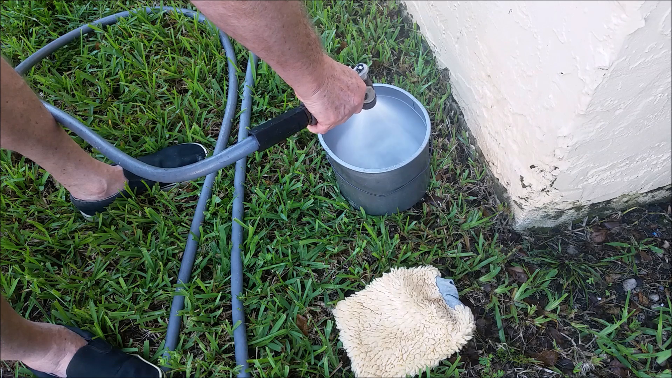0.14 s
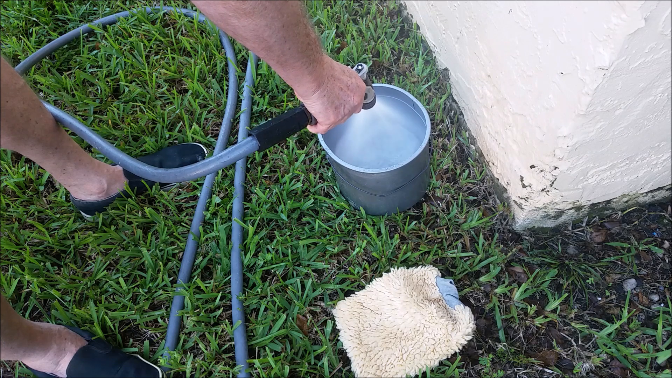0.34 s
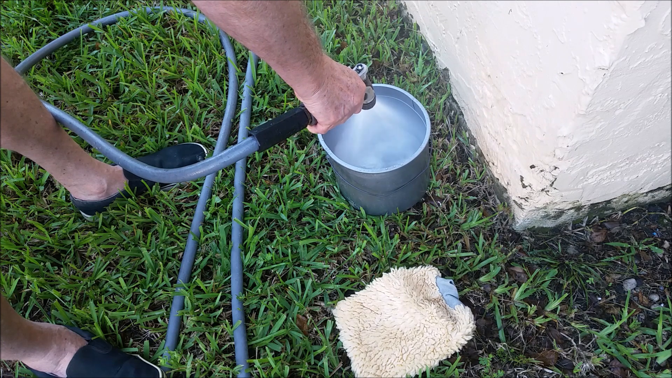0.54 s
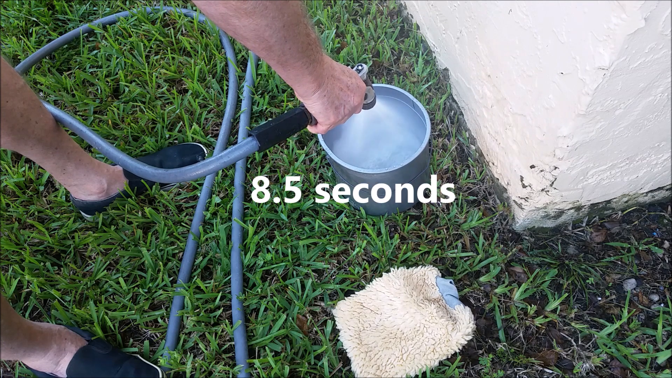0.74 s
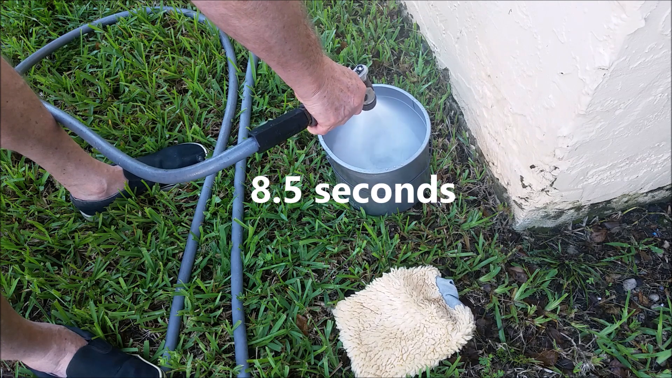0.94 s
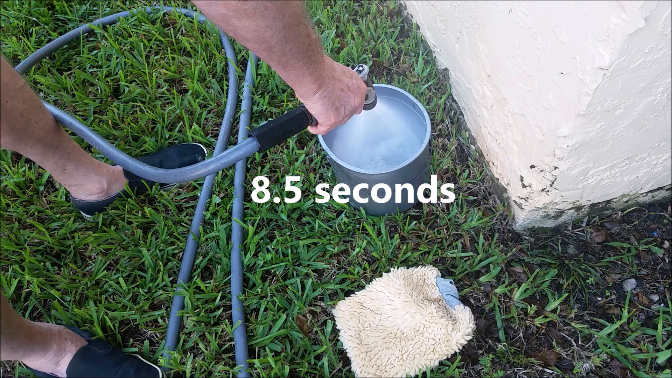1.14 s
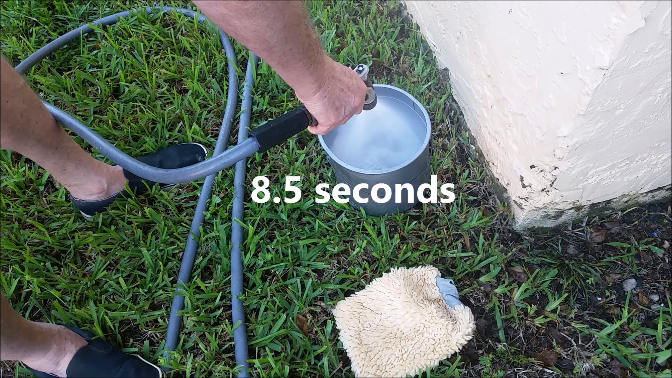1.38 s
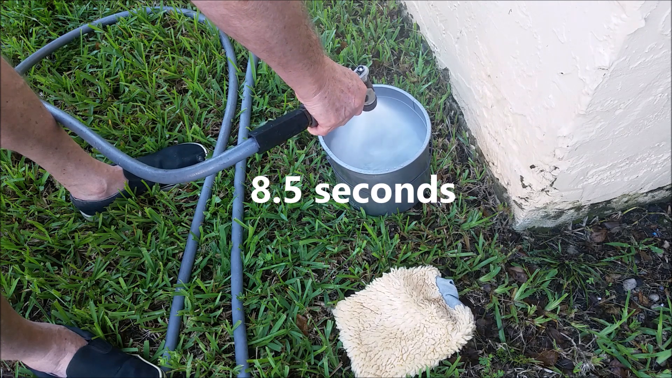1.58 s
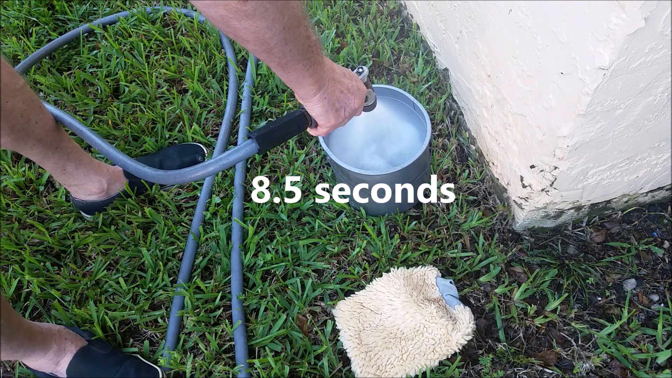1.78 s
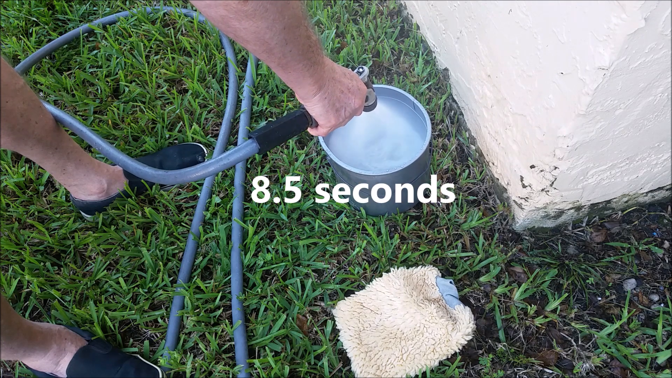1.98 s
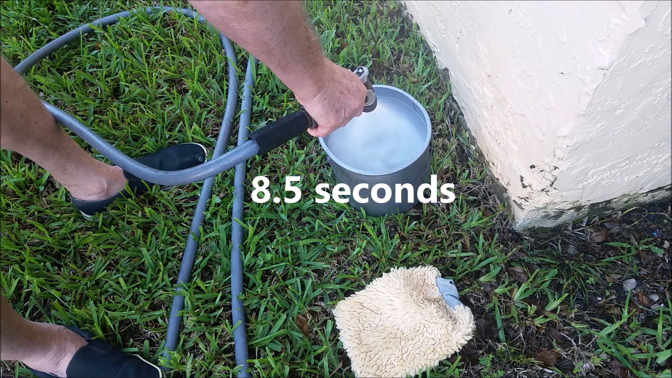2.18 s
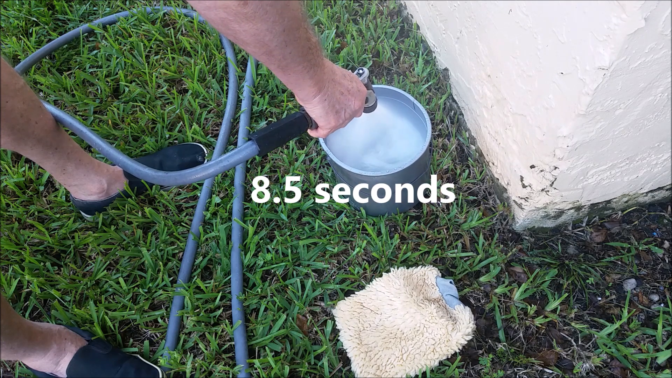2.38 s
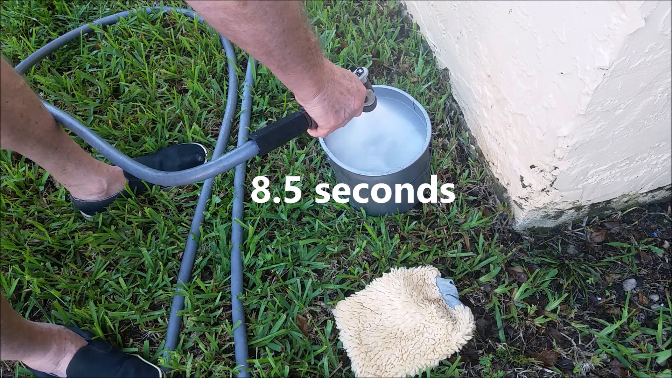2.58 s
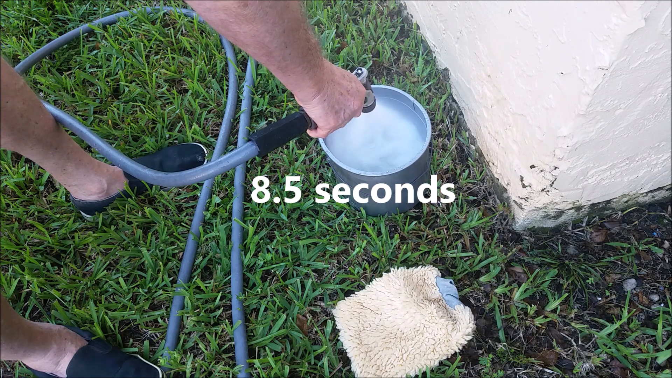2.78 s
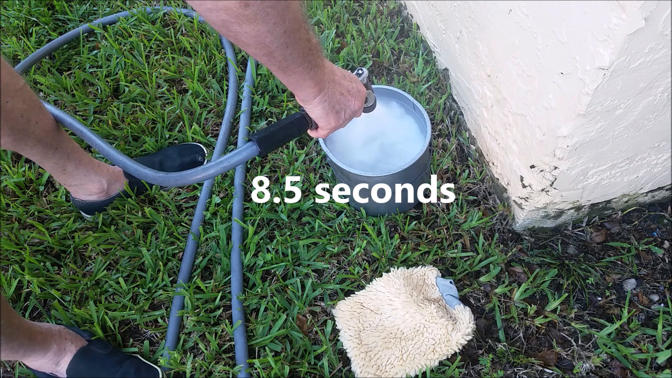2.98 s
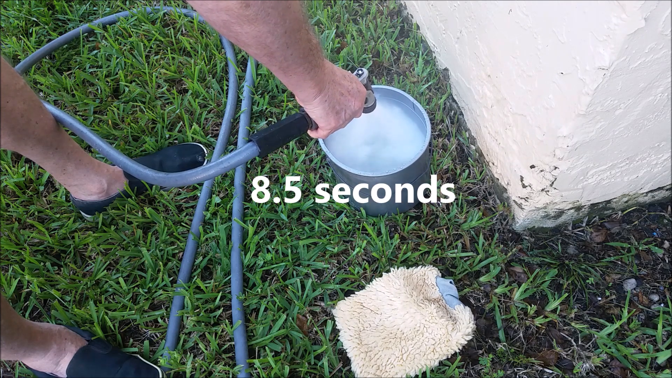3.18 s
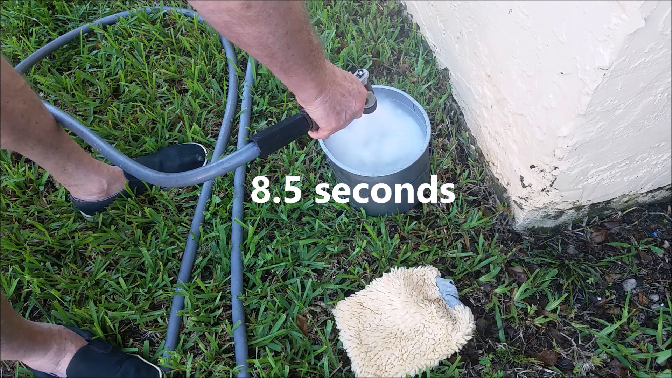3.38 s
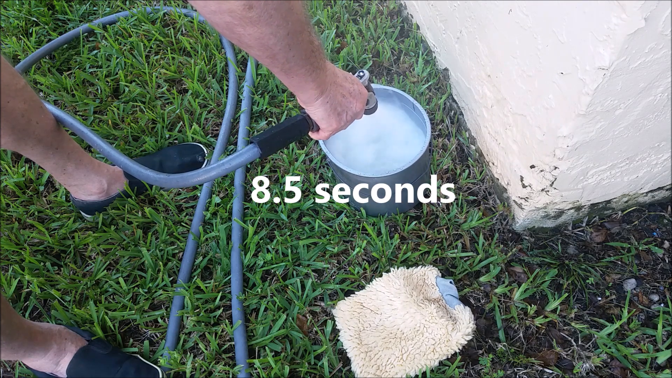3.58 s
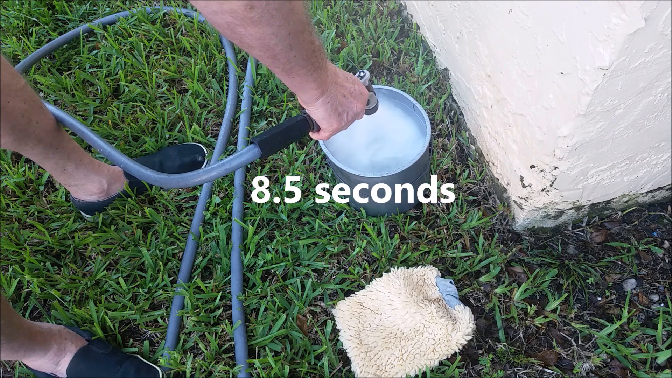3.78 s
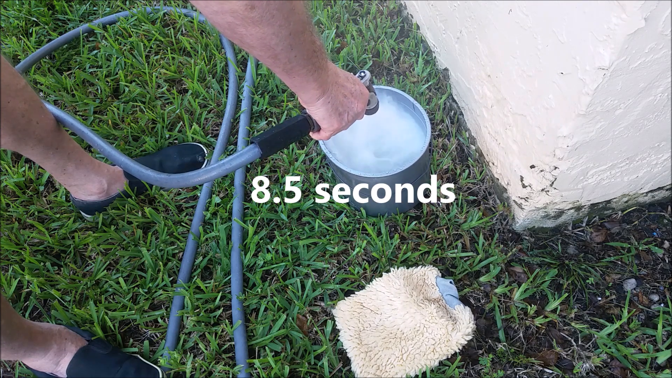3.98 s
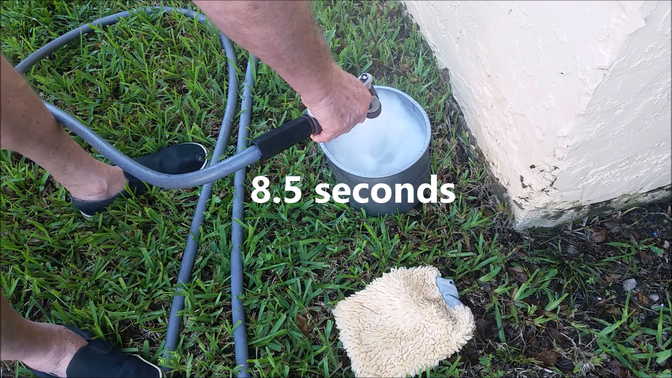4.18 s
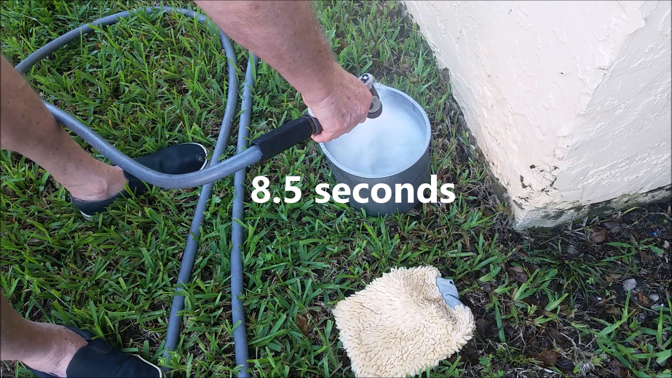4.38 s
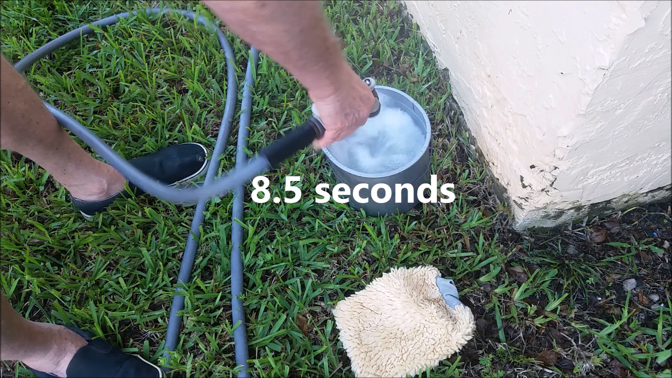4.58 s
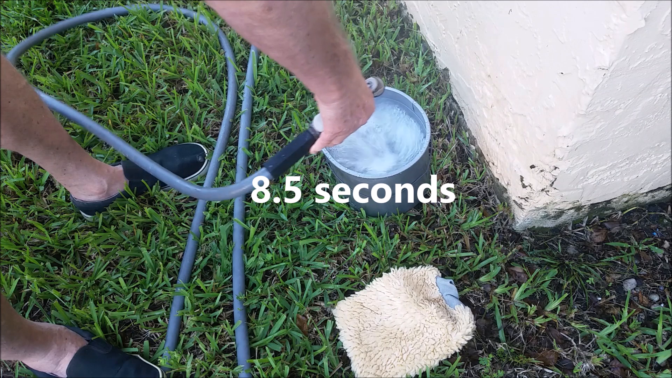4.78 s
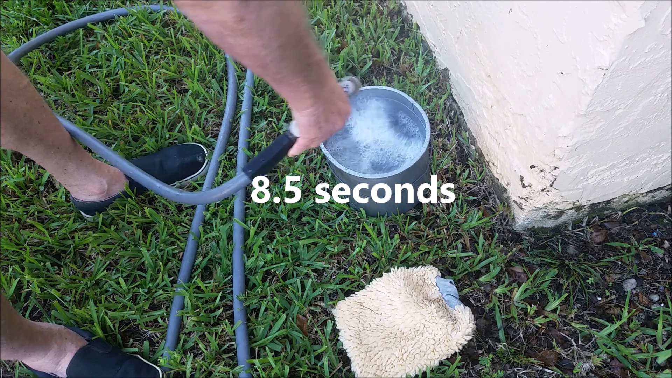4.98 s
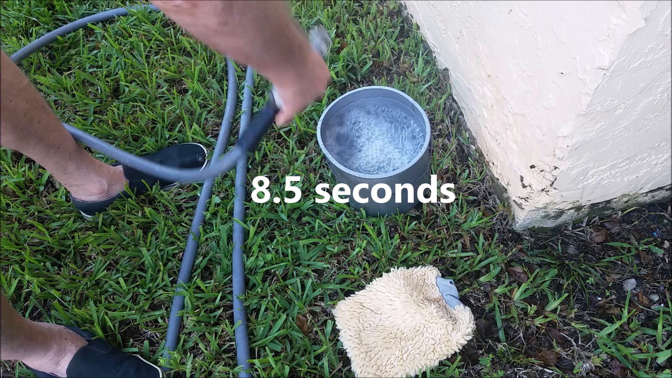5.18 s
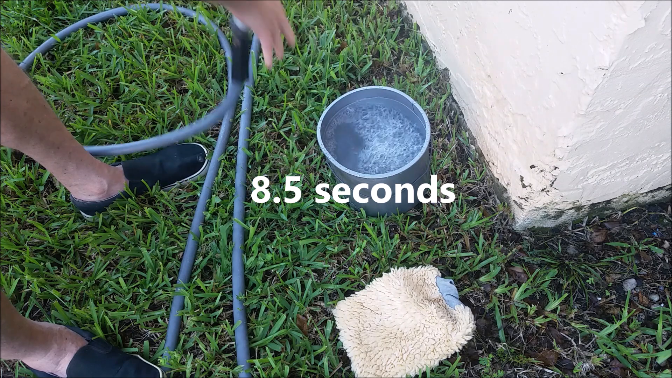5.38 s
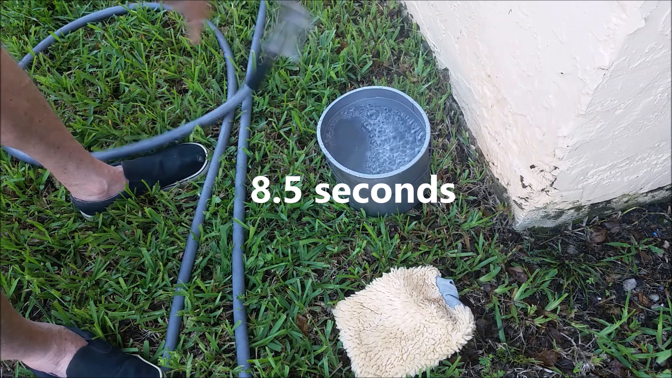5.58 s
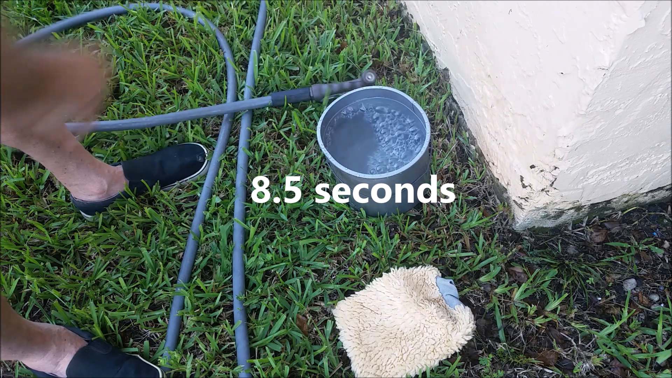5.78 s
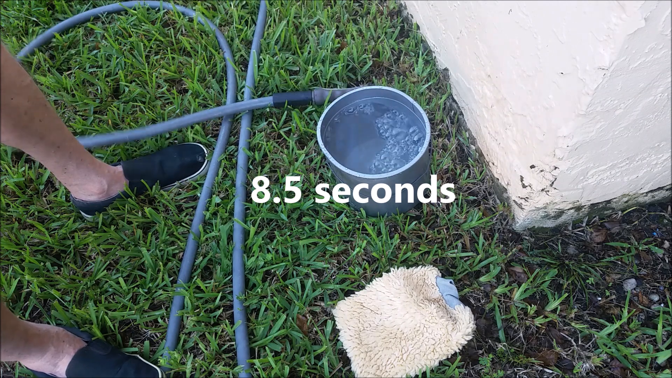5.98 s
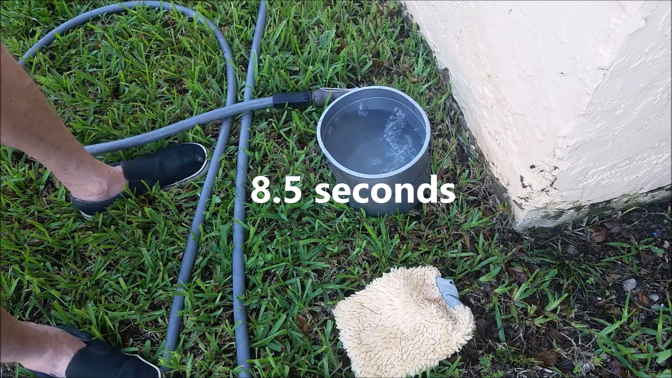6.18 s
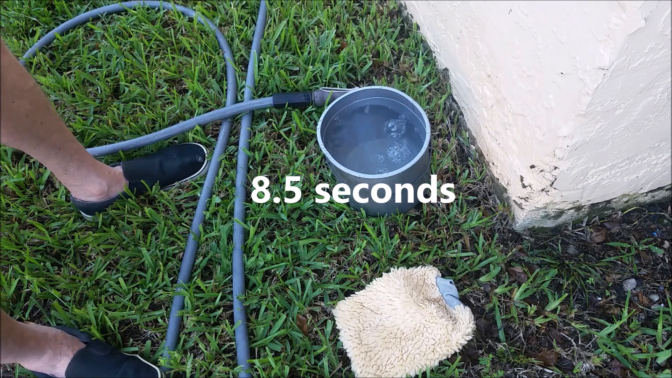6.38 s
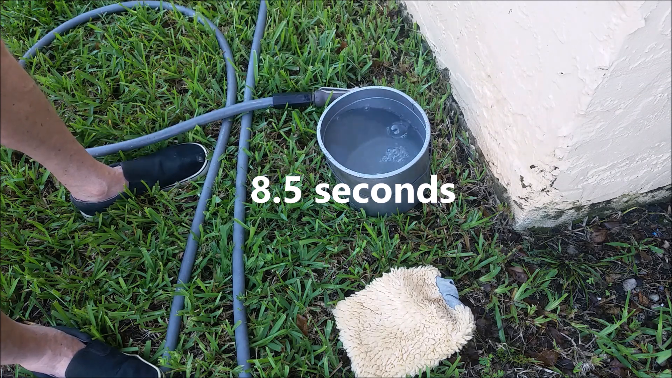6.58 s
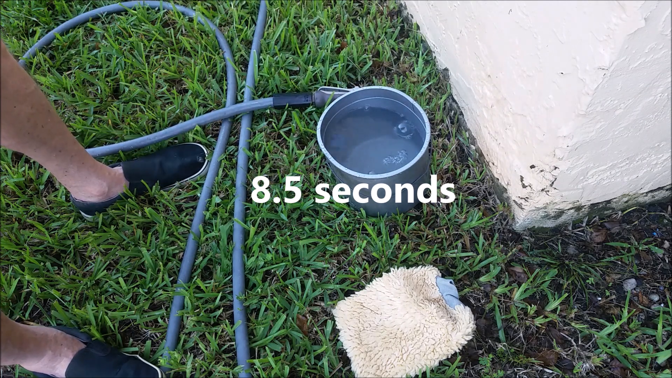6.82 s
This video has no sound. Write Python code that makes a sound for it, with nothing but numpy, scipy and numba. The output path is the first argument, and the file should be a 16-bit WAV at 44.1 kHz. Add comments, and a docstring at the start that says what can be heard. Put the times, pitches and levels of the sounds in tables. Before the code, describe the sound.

Close microphones catch a strong jet of water hissing and churning in a metal bucket, its hollow tone shifting slightly as it fills. The spray stops suddenly, followed by a few small clicks from the hose nozzle and a soft, fading fizz of bubbles. The hose then brushes the grass and lands with a light knock. Faint traffic, a far engine and a machine's hum fill the outdoor background.

```python
"""On a lawn, two microphones close to a metal bucket. A hose nozzle sprays hard into it: dense drops and
bubbles hiss and ring the air above the rising water. The valve snaps shut, the foam fizzes away,
the trigger clicks and the nozzle is dropped in the grass. Distant traffic, a far engine,
a machine's hum and a faint electronic whine lie underneath."""
import sys
import numpy as np
from scipy import signal
from scipy.fft import rfft, irfft, next_fast_len
from scipy.io import wavfile
from numba import njit

SR = 44100
rng = np.random.default_rng(int(sys.argv[2]) if len(sys.argv) > 2 else 0)


def wav_out(sig):
    """Save sig, one row per channel (or a flat mono array), as 16-bit PCM at SR to the path in sys.argv[1]."""
    wavfile.write(sys.argv[1], SR, np.round(np.clip(np.atleast_2d(sig).T, -1, 1) * 32767).astype(np.int16))


N = 302085
TIME = np.arange(N) / SR
SHUT_S = 4.695  # the trigger is let go
SINCE_SHUT_S = np.maximum(TIME - SHUT_S, 0)

# spectrum of spray striking the water: frequency_hz, level_db_per_hz
SPLASH_SPECTRUM = [(30, -78), (130, -68.5), (430, -65.5), (2950, -63.5), (3400, -58), (3950, -58),
                   (4500, -55), (5400, -60), (6400, -60.5), (6900, -58.5), (8050, -60), (9200, -70),
                   (10800, -68.5), (13300, -70), (15700, -77.5)]


def undb(db):
    """Decibels to gain."""
    return 10 ** (np.asarray(db) / 20)


def unit(x):
    """Scale to a standard deviation of 1."""
    return x / np.std(x)


def per_hz(x):
    """Scale a flat-spectrum signal to 0 dB per Hz."""
    return unit(x) * np.sqrt(SR / 2)


def colour(x, points):
    """Filter by a curve of (frequency_hz, gain_db) points."""
    hz, db = np.transpose(points)
    size = next_fast_len(N + SR // 10)
    bin_hz = np.maximum(np.arange(size // 2 + 1) * SR / size, 1)
    gain = undb(np.interp(np.log(bin_hz), np.log(hz), db))
    return irfft(rfft(x, size) * gain, size)[:N]


def wander(rate_hz):
    """Smooth random drift with spread 1 that turns about rate_hz times a second."""
    bin_hz = np.arange(N // 2 + 1) * SR / N
    return unit(irfft(rfft(rng.standard_normal(N)) * np.exp(-(bin_hz / rate_hz) ** 2), N))


@njit
def resonate(x, hz, width_hz):
    """State-variable band-pass with a moving centre, gain 1 at the peak."""
    out, band_state, low_state = np.empty(len(x)), 0., 0.
    for i in range(len(x)):
        tuning, damping = np.tan(np.pi * hz[i] / SR), width_hz / hz[i]
        band = (band_state + tuning * (x[i] - low_state)) / (1 + tuning * (tuning + damping))
        band_state = 2 * band - band_state
        low_state += 2 * tuning * band
        out[i] = damping * band
    return out


def impacts(per_s, spread_db):
    """Tiny clicks of uneven size at random moments."""
    size = undb(spread_db * np.clip(rng.standard_normal(N), -3, 3))
    return unit((rng.random(N) < per_s / SR) * size * rng.choice([-1, 1], N))


def bubbles(low_hz, high_hz, cycles, spread_db, count, samples=400):
    """Each bubble rings, gliding up as it nears the surface and losing 40 dB over the given cycles."""
    when, pitch, strength, turn = rng.random((count, 4)).T[:, :, None]
    hz = low_hz * (high_hz / low_hz) ** pitch
    age_s = np.arange(samples) / SR
    life = age_s * hz / cycles
    phase = 2 * np.pi * (hz * age_s * (1 + .06 * np.minimum(life, 1)) + turn)
    size = hz * undb(spread_db * strength)  # weighting by pitch keeps the overall spectrum flat
    rings = size * undb(-40 * life) * np.sin(phase)
    places = (when * N).astype(int) + np.arange(samples)
    return unit(np.bincount(places.ravel(), rings.ravel(), N)[:N])


def flow(valve_t60_s=.096, settle_t60_s=.8, settle_db=-22.5):
    """The jet runs until the valve cuts it; the last drops and the churning die more slowly."""
    valve = undb(-60 * SINCE_SHUT_S / valve_t60_s)
    settle = undb(-60 * SINCE_SHUT_S / settle_t60_s)
    return valve + undb(settle_db) * (settle - valve)


def bucket_air(fill, gurgle_below_hz=1100):
    """Drops ring the air in the bucket, whose resonances shift as fill goes from 0 to 1."""
    # air resonances: shallow_hz, filled_hz, width_hz, shallow_db_per_hz, filled_db_per_hz
    air_modes = [(287.5, 201, 104, -55, -56.5), (552, 622, 140, -55, -58), (685, 704, 121, -56.5, -51),
                 (817, 864, 263, -60, -54), (1074, 1090, 310, -56.5, -60.5),
                 (1414, 1440, 258, -54.5, -54.5), (1764, 1720, 230, -51, -53.5),
                 (2010, 1933, 310, -48, -52.5), (2276, 2180, 330, -55.5, -57),
                 (2496, 2474, 290, -55.5, -58)]
    out = np.zeros(N)
    for shallow_hz, filled_hz, width_hz, shallow_db, filled_db in air_modes:
        sway = 1 + .018 * wander(8.4)  # the surface heaves
        hz = (shallow_hz + (filled_hz - shallow_hz) * fill) * sway
        drops = per_hz(impacts(per_s=8000, spread_db=3.5))  # each resonance is fed by different drops
        ring = resonate(resonate(drops, hz, float(width_hz)), hz, float(width_hz))
        # big pockets of air dragged under by the jet feed the low resonances
        surge_db = .35 + 1.1 * wander(9.9) if shallow_hz < gurgle_below_hz else .55 * wander(12)
        out += ring * undb(shallow_db + (filled_db - shallow_db) * fill + surge_db)
    return out


def spray(shallow_db=-.44, filled_db=.72, sputter_db=.42):
    """Close up, drops and bubbles hiss on the water and ring the bucket as it fills."""
    fill = np.minimum(TIME / SHUT_S, 1) ** .67  # changes fastest while the water is shallow
    froth_db = shallow_db + (filled_db - shallow_db) * fill  # deeper froth hisses more
    drops = impacts(per_s=30000, spread_db=2.5)
    bubbling = undb(-8) * bubbles(1974, 14700, cycles=25, spread_db=-1.5, count=8000)
    hiss = colour(per_hz(drops + bubbling), SPLASH_SPECTRUM) * undb(froth_db + sputter_db * wander(30))
    body = bucket_air(fill)
    flutter_db = .2 * wander(12)  # mains pressure holds the jet almost steady
    return (hiss + body) * flow() * undb(flutter_db)


def wall_scatter(gain_db=-24, above_hz=2400):
    """A little of the spray's treble scatters off the wall."""
    scatter = colour(per_hz(rng.standard_normal(N)), SPLASH_SPECTRUM) * flow() * undb(gain_db)
    return signal.sosfilt(signal.butter(8, above_hz, "high", fs=SR, output="sos"), scatter)


def traffic():
    """Tyre roar and rumble carry from far roads."""
    # distant road noise: frequency_hz, level_db_per_hz
    road_spectrum = [(20, -75.5), (45, -64.5), (70, -63), (115, -62), (190, -67.5), (300, -72), (530, -77),
                     (1020, -72), (1600, -77.5), (2600, -94.5), (5000, -108), (9000, -127), (11800, -116),
                     (15500, -117)]
    return colour(per_hz(rng.standard_normal(N)), road_spectrum) * undb(.5 * wander(3))


def far_engine(start_hz=87.7, sag_hz_per_s=.46, tone_db=-54, swell_db=13, swell_s=5.25, swell_width_s=.35):
    """A far engine drones over its exhaust noise, slowly losing speed and swelling once."""
    # exhaust rumble: frequency_hz, gain_db
    exhaust_spectrum = [(15, -19.5), (45, -3), (125, -2.5), (220, -24.5), (2000, -76.5)]
    hz = (start_hz - sag_hz_per_s * TIME) * (1 + .025 * wander(13))
    tone = unit(np.sin(2 * np.pi * np.cumsum(hz) / SR))
    exhaust = undb(-2) * unit(colour(rng.standard_normal(N), exhaust_spectrum))
    swell = np.exp(-((TIME - swell_s) / swell_width_s) ** 2)
    return (tone + exhaust) * undb(tone_db + swell_db * swell + 1.3 * wander(8))


def machine_hum():
    """A machine in the neighbourhood hums in narrow tones whose level and phase wander."""
    # hum tones: pitch_hz, width_hz, level_db
    hum_tones = [(132.3, 7.3, -49), (1260, 3.3, -57)]
    out = np.zeros(N)
    for hz, width_hz, db in hum_tones:
        phase = 2 * np.pi * hz * TIME
        out += undb(db) * (wander(width_hz) * np.cos(phase) + wander(width_hz) * np.sin(phase))
    return out


def electronic_whine(pulse_hz=68, sharpness=1.4):
    """Electronics give off thin, faint tones that pulse evenly."""
    # whine tones: pitch_hz, level_db
    whine_tones = [(5350, -81), (9383, -94.5), (11560, -80.5), (13470, -79.5), (13735, -83), (15620, -75.5)]
    pulse = np.exp(sharpness * np.cos(2 * np.pi * pulse_hz * TIME))
    return sum(undb(db) * unit(pulse * np.sin(2 * np.pi * hz * TIME)) for hz, db in whine_tones)


def nozzle_knocks(crack_db=5, crack_t60_s=.016, scatter_db=-18, scatter_t60_s=.13):
    """Each knock of the nozzle is a crack and a short metallic ring, with a faint scatter off the wall."""
    # knocks and the band each contact excites: start_s, peak_db, centre_hz, width_octaves, ring_time_ratio
    knocks = [(.5238, -9.5, 5600, .5, 1.1), (4.743, -16.5, 1900, .4, .3), (4.768, -35, 8200, .35, .3),
              (5.0105, -36, 3100, .3, 1.1), (5.0352, -20.5, 4000, .6, .85), (5.2215, -42, 4300, .55, 1.1),
              (5.8214, -25.5, 2250, .9, .7)]
    # modes of the metal nozzle: pitch_hz, gain_db, t60_s
    nozzle_modes = [(1394, -3.5, .03), (1990, -5.5, 0.024), (3150, -4.5, 0.032), (3580, 3, 0.011),
                    (3880, 0.5, 0.027), (4240, -3, 0.023), (4750, -13.5, 0.043), (5540, -5, 0.025),
                    (6080, -10, 0.058), (7160, -10, .03), (7760, -7, .025), (9380, -12, 0.045),
                    (13400, 0, .02)]
    out, age_s = np.zeros(N), TIME[:SR // 4]
    samples = len(age_s)
    bin_hz = np.maximum(np.arange(samples // 2 + 1) * SR / samples, 1)
    crack = undb(crack_db - 60 * age_s / crack_t60_s)
    scatter = undb(scatter_db - 60 * age_s / scatter_t60_s)
    fade = 1 - age_s / age_s[-1]
    for start_s, peak_db, centre_hz, width_octaves, ring_time_ratio in knocks:
        ring = np.zeros(samples)
        for hz, gain_db, t60_s in nozzle_modes:
            decay = undb(gain_db - 60 * age_s / (t60_s * ring_time_ratio))
            ring += decay * np.sin(2 * np.pi * (hz * age_s + rng.random()))
        noise = (crack + scatter) * rng.standard_normal(samples)
        offset = np.log2(bin_hz / centre_hz) / width_octaves
        contact_band = 1 / np.sqrt(1 + offset ** np.where(offset < 0, 8, 6))  # steeper on the bass side
        knock = irfft(rfft(ring + noise) * contact_band, samples) * fade
        start = int(start_s * SR)
        out[start:start + samples] += undb(peak_db) * knock / np.abs(knock).max()
    return out


def foam(loss_db=11.5, loss_after_s=1.96):
    """Small bubbles burst in a soft fizz; once the valve shuts, the froth lingers, then thins ever faster."""
    # bursting foam: frequency_hz, level_db_per_hz
    fizz_spectrum = [(700, -92.5), (1900, -83.5), (2900, -91.5), (3800, -99), (4900, -94.5), (6300, -106),
                     (7500, -107), (8900, -124), (15000, -128)]
    pops = impacts(per_s=15000, spread_db=2)
    bubbling = undb(-4.5) * bubbles(1500, 10000, cycles=53, spread_db=9.5, count=9000)
    thinning = undb(-loss_db * (SINCE_SHUT_S / loss_after_s) ** 2)
    return colour(per_hz(pops + bubbling), fizz_spectrum) * thinning


def hose_in_grass():
    """Grass blades brush the falling hose; each rustle rises and dies away."""
    # brushes, rising and falling over 60 dB: peak_s, gain_db, rise_s, fall_s
    brushes = [(5.648, -3, .12, .45), (5.84, 2.5, .25, 0.54)]
    # grass rubbing on the hose: frequency_hz, level_db_per_hz
    grass_spectrum = [(1500, -104), (4500, -94), (7800, -100), (9200, -117), (13500, -116)]
    rustle = sum(undb(db - 60 * np.maximum((peak_s - TIME) / rise_s, (TIME - peak_s) / fall_s))
                 for peak_s, db, rise_s, fall_s in brushes)
    return colour(per_hz(impacts(per_s=3700, spread_db=5.5)), grass_spectrum) * rustle


def scene():
    """Two close microphones hear the lawn in phase; only their treble and the wall's scatter differ."""
    # treble balance of the microphones: frequency_hz, left_minus_right_db
    balance = [(1600, 0), (2100, .3), (2900, 1.8), (3700, 5.2), (5300, 8.3), (6500, 7.5), (7400, 4.6),
               (8300, 0), (9000, -.5), (9900, -2.2), (11800, 0)]
    close = spray() + foam() + hose_in_grass() + nozzle_knocks()
    distant = traffic() + far_engine() + machine_hum()
    mid = close + distant
    left_curve = [(hz, 20 * np.log10(2 / (1 + undb(-db)))) for hz, db in balance]
    side = colour(mid, left_curve) - mid + wall_scatter()
    return np.array([mid + side, mid - side]) + electronic_whine()


def record(dry):
    """The recorder cuts the top steeply."""
    top_hz = 15750
    return signal.sosfilt(signal.ellip(12, .1, 80, top_hz, fs=SR, output="sos"), dry)


dry = scene()
out = record(dry)
wav_out(out)
```